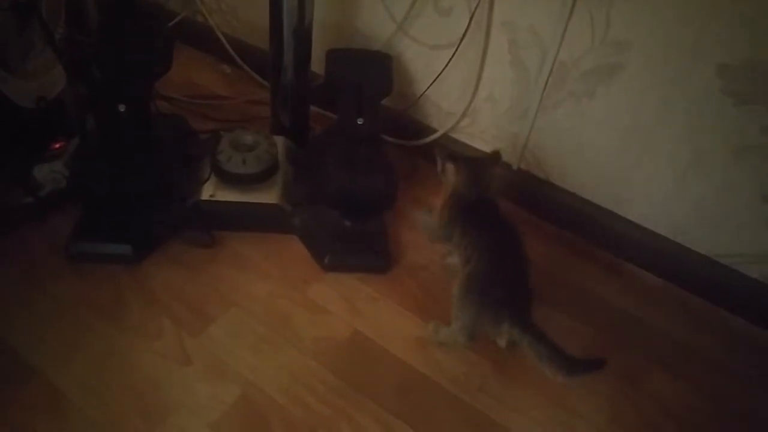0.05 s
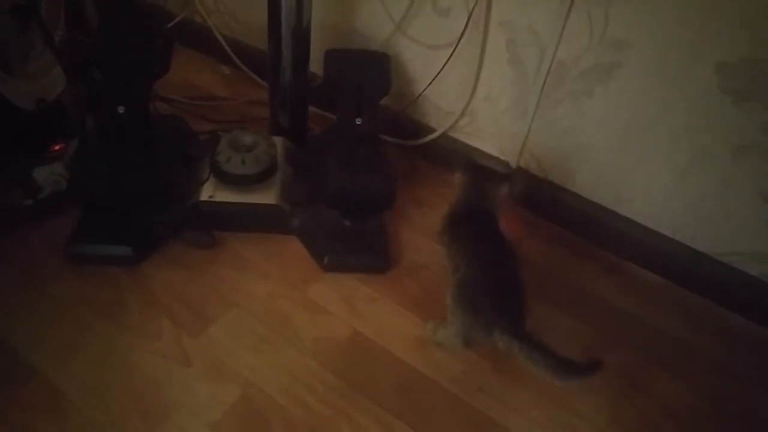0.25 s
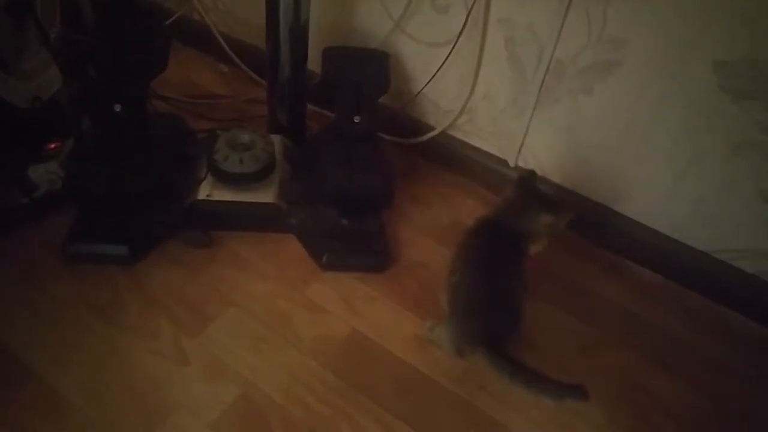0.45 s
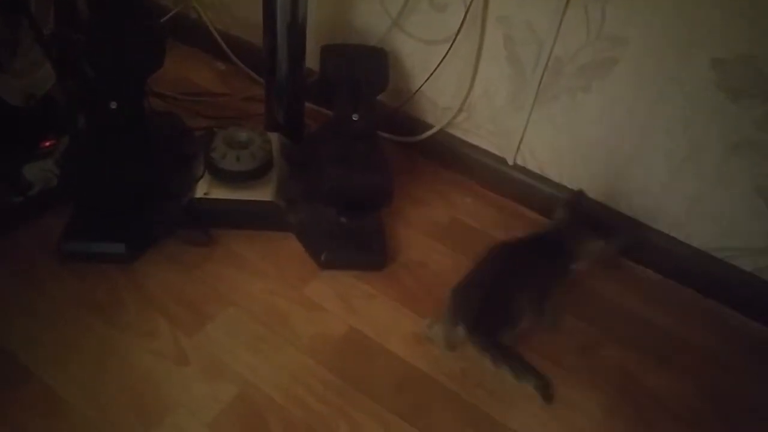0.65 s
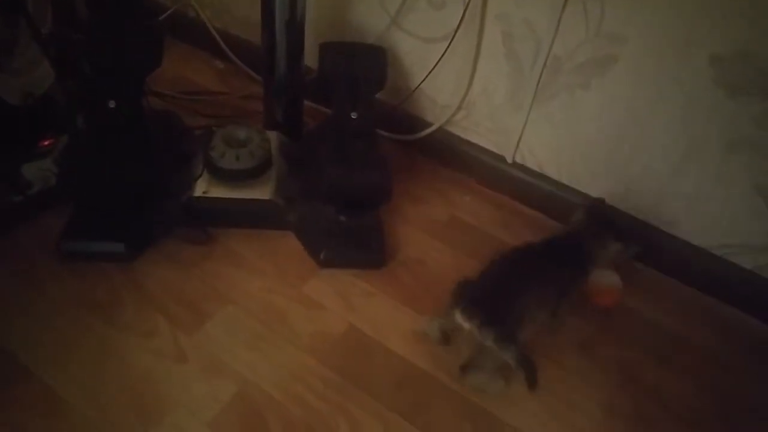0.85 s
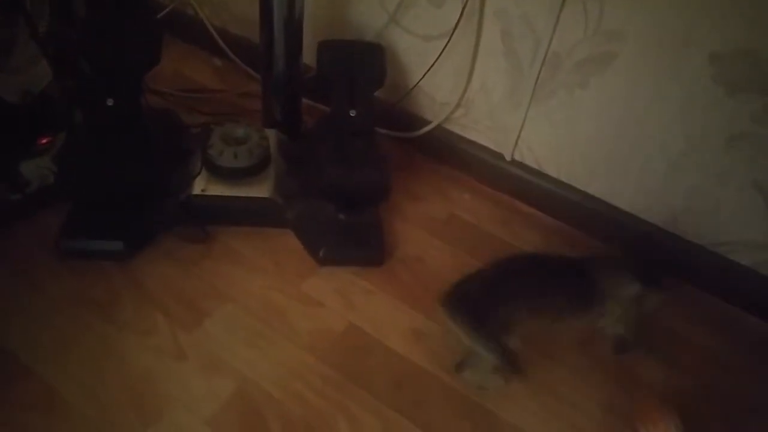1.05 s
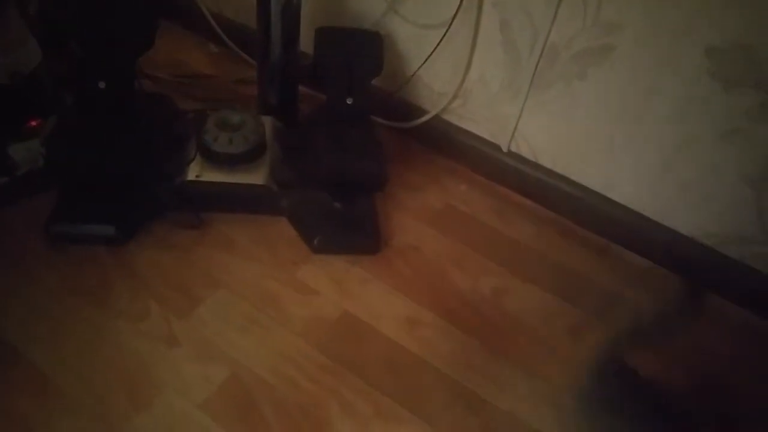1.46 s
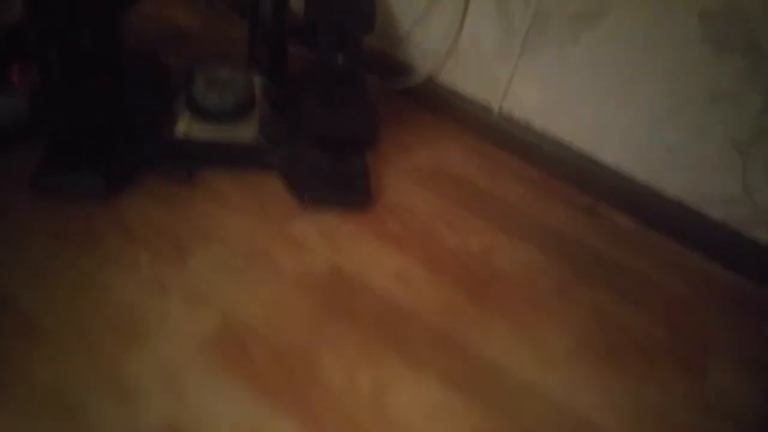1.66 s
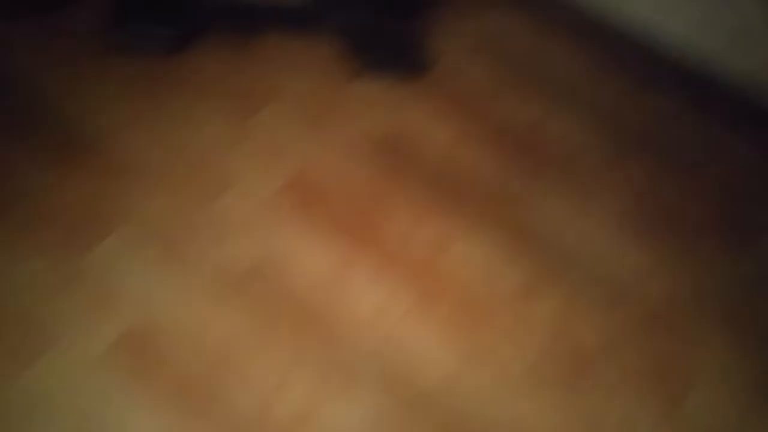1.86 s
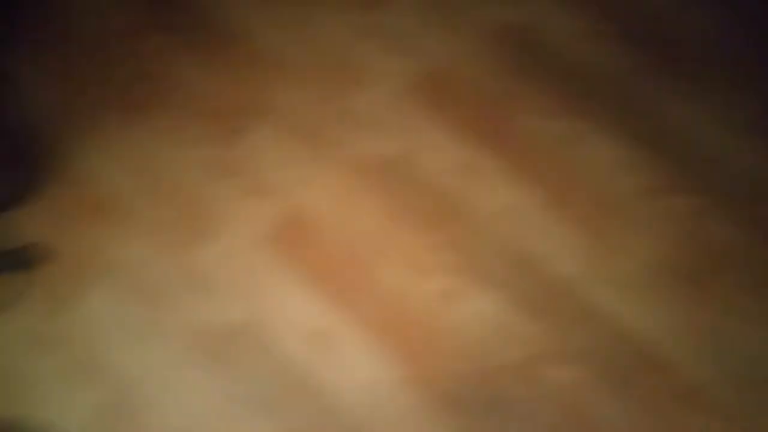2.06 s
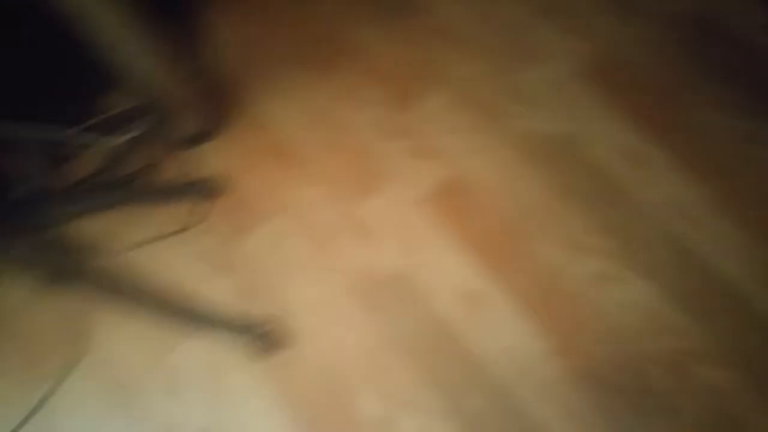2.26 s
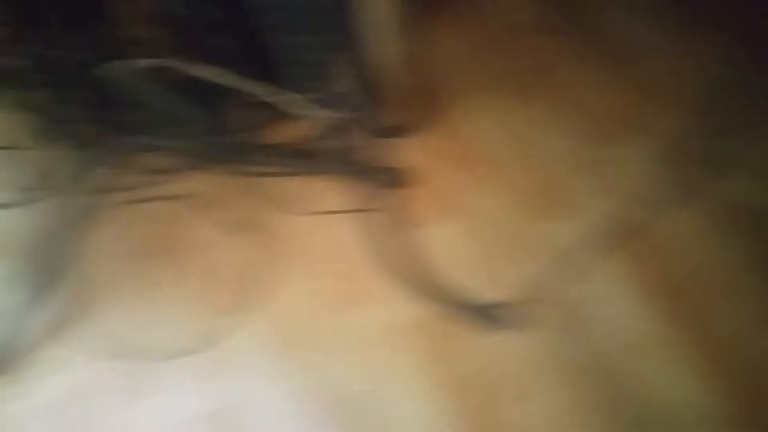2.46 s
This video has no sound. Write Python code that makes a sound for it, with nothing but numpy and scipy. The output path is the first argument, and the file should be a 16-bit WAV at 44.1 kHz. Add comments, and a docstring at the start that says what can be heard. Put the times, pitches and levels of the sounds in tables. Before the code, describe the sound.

A small bell jingles and chatters unevenly inside a hollow ball that a kitten chases over hard floorboards. The shell clacks along and bumps furniture near the end, over a faint appliance hum in a small room, in stereo.

```python
"""A faint appliance hum in a small room, then a jingle: a kitten bats a plastic ball with a bell inside
across a laminate floor, heard on a stereo pair. The pellet strikes the bell and chatters between
strikes; the hollow shell scuffs and taps along the boards as it rolls. Paws thud softly, the floor
rumbles under the play, and near the end the ball knocks against wooden furniture."""
import sys
import numpy as np
from scipy import signal
from scipy.fft import rfft, irfft
from scipy.io import wavfile

SR = 44100
rng = np.random.default_rng(int(sys.argv[2]) if len(sys.argv) > 2 else 0)


def pcm_store(signal):
    """Save signal as 16-bit PCM."""
    levels = np.round(np.clip(np.atleast_2d(signal), -1, 1) * 32767)
    wavfile.write(sys.argv[1], SR, levels.astype(np.int16).T)


N = 110250
TIME = np.arange(N) / SR
AGE = np.arange(SR // 4) / SR  # seconds since a contact
ATTACK_S, THUD_ATTACK_S = 0.0013, 0.0057
CLACK_LIKENESS, TICK_LIKENESS = 0.0074, -0.0064  # left-right correlation: both sound wide

# the bell's partials: (frequency [Hz], relative level [dB], t60 [s])
BELL = [(3400, -5, 0.062), (4024, 1, 0.086), (5257, -1.5, 0.055), (5300, 1.5, 0.063), (5523, -6, 0.028),
        (6478, -5, 0.022), (6760, -25.5, 0.055), (7120, -18.5, 0.034), (7120, 1, 0.022), (7290, 1, 0.089),
        (7320, -8.5, 0.039), (7260, -6.5, 0.04)]


def from_db(db):
    """Decibels to gain."""
    return 10 ** (np.asarray(db) / 20)


def rms_one(x):
    """Scale to unit power."""
    return x / np.sqrt(np.mean(x ** 2) + 1e-20)


def head_one(x):
    """Scale a hit to unit power over its first 11 ms."""
    return x / np.sqrt(np.mean(x[:, :SR // 90] ** 2) + 1e-20)


def curve(rows, column=1):
    """Gain over time from one dB column of a table."""
    rows = np.array(rows)
    return from_db(np.interp(TIME, rows[:, 0], rows[:, column]))


def add(out, s, sound):
    """Mix a sound in at s seconds."""
    i = max(int(s * SR), 0)
    out[:, i:i + sound.shape[1]] += sound[:, :N - i]


def noise(spectrum, likeness, size=N):
    """Stereo noise of a given colour and correlation between the microphones."""
    hz, db = np.transpose(spectrum)
    f = np.maximum(np.fft.rfftfreq(size, 1 / SR), 1)
    gain = from_db(np.interp(np.log(f), np.log(hz), db))
    skirts = np.minimum(f / hz[0], 1) * np.minimum(hz[-1] / f, 1)
    mid, side = irfft(rfft(rng.standard_normal((2, size))) * gain * skirts, size)
    return rms_one(np.sqrt(1 + likeness) * mid + np.sqrt(1 - likeness) * side * np.array([[1], [-1]]))


def grain(depth_db, per_s, size=N):
    """A randomly flickering gain of unit power."""
    knots = rng.standard_normal(4000)
    flicker = np.interp(np.arange(size) / SR * per_s, np.arange(len(knots)), knots)
    return rms_one(from_db(depth_db * flicker))


def ring(modes, attack_s=ATTACK_S, scattered=False):
    """One blow on a set of modes; they reach the two microphones a lag apart, or scattered in phase."""
    detune_hz, spread_db, lag_s = 12.8, 4.5, 0.00016
    out = np.zeros((2, len(AGE)))
    for hz, db, t60 in modes:
        detune, strength, turn, start = rng.standard_normal(4)
        left_lead = 1.53 + 0.38 * turn if scattered else -2 * np.pi * hz * lag_s
        pitch = hz + detune_hz * detune * min(hz / 2000, 2)
        phase = 2 * np.pi * (pitch * AGE + start) + np.array([[left_lead], [0]])
        out += from_db(db + spread_db * strength - 60 * AGE / t60) * np.sin(phase)
    return head_one(out * np.minimum(AGE / attack_s, 1))


def burst(spectrum, t60, likeness, hold_s=0):
    """The grainy, fast dying noise of a contact, coloured differently every time."""
    hz, db = np.transpose(spectrum)
    spots_hz = np.linspace(hz[0], hz[-1], 28)
    patchy_db = np.interp(spots_hz, hz, db) + 5.5 * rng.standard_normal(len(spots_hz))
    hiss = noise(np.column_stack([spots_hz, patchy_db]), likeness, size=len(AGE))
    envelope = from_db(-60 * np.maximum(AGE - hold_s, 0) / t60) * np.minimum(AGE / ATTACK_S, 1)
    return head_one(hiss * envelope * grain(depth_db=-2, per_s=820, size=len(AGE)))


def room_tone():
    """An appliance's wavering hum, still air, and the floor rumbling under the play."""
    # the hum and the rumble, both faint at first: (time [s], relative level [dB])
    hum_levels = [(0, -74), (.15, -72), (.25, -66.5), (2.5, -68.5)]
    rumble_levels = [(0, -9.5), (.15, -16), (.25, -3.5), (.55, -6), (.8, -4.5), (1, 1), (1.9, 2),
                     (2.5, 2.5)]
    # colours of the air and the floor: (frequency [Hz], relative level [dB])
    air_colour = [(20, -8), (60, 15), (110, 42), (170, 2), (250, 11), (390, -3.5), (520, -22), (900, -47.5),
                  (2000, -33), (7000, 21), (16000, -15)]
    rumble_colour = [(25, -39), (60, 0.5), (90, -10), (160, -7.5), (240, -1), (380, 4), (500, -9),
                     (700, -10), (2000, -36)]
    hum_hz = 119.7
    tone = np.sqrt(2) * np.sin(2 * np.pi * hum_hz * TIME)
    hum = curve(hum_levels) * tone * grain(depth_db=3, per_s=22)
    air = from_db(-80) * noise(air_colour, likeness=0.69)
    rumble = from_db(-59.5) * curve(rumble_levels) * noise(rumble_colour, likeness=0.92)
    return hum + air + rumble


def bell_chatter():
    """The pellet tumbles inside the bell: small random touches ring it and tick."""
    # the chatter's swells: (time [s], level [dB])
    swells = [(.17, -79.5), (.195, -38), (.28, -49), (.36, -48), (.47, -44.5), (.57, -66.5), (.62, -56),
              (.8, -66), (.88, -45.5), (.94, -51), (1.05, -32), (1.095, -45), (1.15, -40), (1.21, -36),
              (1.25, -48.5), (1.4, -41.5), (1.63, -49.5), (1.8, -45.5), (1.9, -47), (2.0, -28.5),
              (2.06, -39.5), (2.14, -30), (2.21, -38), (2.26, -44.5), (2.34, -47.5), (2.43, -47),
              (2.5, -36)]
    # how light touches reach the partials, and their hiss: (frequency [Hz], relative level [dB])
    reach = [(3000, -2), (4000, -10), (5300, 1), (6700, 4), (7260, 5.5)]
    hiss_colour = [(1500, -35), (3000, -1), (4500, -5), (5500, -2), (7000, 8), (7800, -5), (9500, -3),
                   (11000, -9.5), (12000, -8.5), (12900, -9.5), (14200, -12), (16000, -12)]
    touches_per_s, tick_decay_s = 260, 0.0079
    touches = (rng.random(N) < touches_per_s / SR) * from_db(2.8 * rng.standard_normal(N))
    ringing = np.zeros((2, N))
    for hz, db, t60 in BELL:
        weight = from_db(db + np.interp(hz, *np.transpose(reach)))
        partial = weight * from_db(-60 * AGE / t60) * np.sin(2 * np.pi * hz * AGE)
        kicks = touches * rng.standard_normal((2, N))
        ringing += signal.fftconvolve(kicks, partial[None], axes=1)[:, :N]
    tick_power = np.abs(signal.fftconvolve(touches ** 2, np.exp(-AGE / tick_decay_s))[:N])
    ticks = rms_one(np.sqrt(tick_power) * noise(hiss_colour, TICK_LIKENESS))
    return curve(swells) * (from_db(-5) * rms_one(ringing) + from_db(-2.5) * ticks)


def hollow(x):
    """The hollow shell lifts a sound at its resonances."""
    # the shell's resonances: (frequency [Hz], lift [dB], width [Hz])
    resonances = [(370, 3, 9.2), (637, 8, 41), (801, 8, 19), (1005, 3.5, 120), (1308, 10, 70),
                  (1580, 0.5, 22)]
    f = np.fft.rfftfreq(N, 1 / SR)
    lift_db = sum(db / (1 + (2 * (f - hz) / width) ** 2) for hz, db, width in resonances)
    return rms_one(irfft(rfft(x) * from_db(lift_db), N))


def scuffing():
    """Shell and claws rub on the boards: two bands of grainy noise."""
    # strength of the rubbing: (time [s], low band [dB], high band [dB])
    levels = [(.17, -74, -86), (.195, -42.5, -45), (.23, -38, -35), (.26, -40, -57), (.31, -37.5, -42.5),
              (.37, -50.5, -54.5), (.48, -52, -58), (.598, -70, -71), (.615, -31.5, -42.5),
              (.65, -43.5, -52.5), (.83, -47, -51.5), (.89, -42, -49.5), (1.0, -50.5, -48.5),
              (1.02, -37.5, -32), (1.05, -43, -39), (1.1, -50.5, -46.5), (1.17, -39.5, -37),
              (1.29, -72, -56), (1.39, -48, -49), (1.5, -56, -41.5), (1.68, -65, -56), (2.05, -56.5, -47.5),
              (2.09, -64, -46), (2.16, -51, -42.5), (2.25, -62, -51.5), (2.34, -62.5, -55.5),
              (2.5, -49, -53)]
    # colours of the bands: (frequency [Hz], relative level [dB])
    low_colour = [(120, -23.5), (250, -9), (400, -9.5), (540, -6), (720, 4.5), (1030, 1), (1300, -4.5),
                  (2000, -24)]
    high_colour = [(700, -82), (1100, -19), (1400, 2), (2200, 5.5), (3000, -3.5), (4500, -1), (8000, -29)]
    low = curve(levels, column=1) * hollow(noise(low_colour, likeness=0.28))
    high = curve(levels, column=2) * hollow(noise(high_colour, CLACK_LIKENESS))
    return (low + high) * grain(depth_db=4.5, per_s=150)


def rebound(hit):
    """The pellet touches three more times within milliseconds, roughening and colouring the ring."""
    mean_gap_s = 0.0018
    out, delay = hit.copy(), 0
    for k, (gap, size) in enumerate(rng.random((3, 2))):
        delay += 1 + int(mean_gap_s * (.5 + gap) * SR)
        out[:, delay:] += from_db(-4.5 + k) * (.5 + size) * hit[:, :-delay]
    return head_one(out)


def jingle(modes, force_db):
    """The pellet buzzes on the ringing bell; struck hard, the bell meets the cage and is choked."""
    buzz_s, choke_after_s, choke_s = .012, 0.0077, 0.0047
    flutter = noise([(35, 0), (350, 0)], likeness=0.31, size=len(AGE))
    buzz = 1 + .55 * np.exp(-AGE / buzz_s) * flutter
    depth_db = .5 * max(force_db + 20, 0) - 1
    contact = 1 - np.exp(-np.maximum(AGE - choke_after_s, 0) / choke_s)
    ringing = rebound(ring(modes, attack_s=0.0027, scattered=True))
    return head_one(ringing * buzz * from_db(-depth_db * contact))


def bell_strikes():
    """Each strike of the pellet rings the bell's groups of partials, ticks and jolts the plastic cage."""
    # pellet strikes: (time [s], five groups of partials near 4, 5.3, 6.5, 6.75 and 7.3 kHz [dB],
    # cage clack [dB], tick [dB], top partials and fizz [dB], left minus right [dB])
    strikes = [(0.1833, -62, -48, -48, -44, -44.0, -59, -56, -68, 5),
               (0.2178, -46, -37, -53, -54, -29, -43.5, -38, -47, 2.5),
               (0.2575, -40, -30, -30.5, -34.5, -33, -46, -38.5, -45, -1.5),
               (0.269, -47, -59, -53, -49.5, -31, -48, -39, -49.0, 10),
               (0.2921, -35, -25.5, -36, -44, -32.5, -46, -37, -32, 0.5),
               (0.4004, -49, -37.5, -31.5, -54, -43, -37.5, -43.5, -44.5, -1),
               (0.4469, -60, -57.5, -54.5, -55, -31.5, -46.5, -49, -62, 3),
               (0.4813, -36, -34, -40.5, -47.5, -26, -38.5, -34.5, -46, 2.5),
               (0.5906, -69.5, -44, -37.5, -35, -40, -64, -49, -51, 1),
               (0.608, -46, -48.0, -46.5, -50, -34.5, -63, -35, -51, 4.5),
               (0.6506, -36.5, -25.5, -35, -28, -38, -33.5, -33, -45.5, -3),
               (0.661, -47, -36, -34, -31.0, -33, -35, -36.5, -39, 4),
               (0.691, -38.5, -59.5, -42, -50, -29, -54, -34, -45, -3),
               (0.7019, -48, -35, -29.5, -24, -45, -48, -34, -34, 3),
               (0.7552, -52, -40, -49.5, -49, -28.5, -31.5, -29, -37, -1.5),
               (0.7721, -67, -32.5, -33, -22.5, -28, -55, -38, -52, 6),
               (0.7963, -77.0, -29.5, -41.5, -40, -28.5, -55, -54, -58.5, -2),
               (0.8065, -75, -46, -48.5, -30.5, -28.5, -63, -49.0, -62, -1),
               (0.829, -76.0, -42, -58.0, -54, -35.5, -64, -43.5, -69.5, 4),
               (0.899, -46, -29.0, -48.5, -27, -30.5, -53, -47, -53.5, 2),
               (0.9252, -46, -29, -29.5, -32, -28.5, -53, -39.5, -41, -4),
               (0.939, -40, -40, -49.5, -47, -23, -47, -45, -46, 9),
               (0.948, -54.5, -48, -53.0, -25.5, -22.5, -50.5, -46, -59.5, 5),
               (0.984, -61, -19.5, -36, -12.5, -23, -56, -36, -40, -1.5),
               (1.0254, -65, -31.5, -37.0, -42, -24.5, -36.5, -28.5, -42, 2),
               (1.08, -43, -56.0, -42, -53, -36.0, -37, -38.0, -46.5, 1.0),
               (1.105, -40, -26.5, -37, -29, -19, -40, -26.5, -37, 0.0),
               (1.1313, -35, -43.0, -31, -36, -17.5, -34, -27, -44, -0.5),
               (1.1588, -56, -52, -43, -47, -33, -36, -49, -62.5, 1),
               (1.187, -57.5, -37, -52.0, -40, -37, -41, -34.5, -49.0, 1),
               (1.205, -65.5, -53.5, -44, -49.0, -30.5, -40.5, -40, -57.5, 2),
               (1.2587, -48, -42, -42, -31.5, -55, -44, -51, -56, -1.5),
               (1.2791, -33, -27, -25, -38.5, -16.5, -40, -27.5, -30.5, 3),
               (1.3498, -37.5, -34.5, -53.5, -56.5, -49, -44, -33, -31, 1.5),
               (1.3824, -41, -33, -39, -40, -34, -37, -36, -43.5, 2),
               (1.4163, -57, -38.5, -20.5, -29.0, -36, -59, -37.0, -37.5, -1),
               (1.4615, -55, -43.5, -46, -37, -31.5, -45, -27.5, -31, 0.5),
               (1.5155, -39.5, -32, -29.5, -34.5, -39, -43.0, -39.5, -59.0, 1.5),
               (1.5504, -51, -39, -35, -31.5, -31, -38, -34, -46, -1),
               (1.642, -52, -56.0, -41, -38, -36.5, -41.5, -45, -47, 1),
               (1.658, -47, -38, -39, -41.5, -33.5, -42.5, -41.5, -52.0, 0),
               (1.6816, -46, -28, -32, -24.5, -28.5, -42.5, -40.5, -65.5, -0.5),
               (1.754, -43, -36.5, -62.0, -47, -49, -64, -39.5, -42.5, -0.5),
               (1.8181, -32.5, -37, -56, -49, -27.5, -57, -34.5, -41.5, 2.5),
               (1.88, -40.5, -46, -53, -43, -36, -50, -40, -49.5, 1.0),
               (1.9119, -64.5, -33.5, -55, -35, -20, -58, -36, -55, -1),
               (1.9512, -39, -35, -56.0, -50.5, -35.0, -50, -38.5, -47.0, 3),
               (1.991, -42.5, -50.5, -52, -61.5, -32, -39.0, -42, -51.5, -4),
               (2.0671, -51, -52, -50.5, -35, -44, -28.5, -33.5, -53, -3),
               (2.0739, -61, -56.5, -42, -37, -19.5, -28.5, -30, -49, 0.5),
               (2.0944, -42.5, -36, -39.0, -48.0, -28.5, -30, -33.5, -41, 1),
               (2.1223, -61.5, -22, -41, -20.5, -31, -38, -40.0, -45, 2.5),
               (2.149, -50, -31.5, -41, -45.0, -33.5, -30, -46, -51.0, -2.5),
               (2.211, -53, -51, -41.5, -50, -44, -38.5, -48, -58, -3),
               (2.3637, -56, -64, -55.5, -62.0, -50, -42.5, -61, -69, -4),
               (2.473, -68.5, -67, -47, -41, -44, -55, -48, -58, -1.5)]
    # the five groups: borders [Hz] and level trims [dB]
    edges = [3000, 4600, 5900, 6600, 6950, 7900]
    trims = [-0.5, -1.5, -2, -2, -1]
    # the bell's highest partials: (frequency [Hz], relative level [dB], t60 [s])
    top_partials = [(12660, -0.21, 0.031), (12700, -1.8, 0.052)]
    # fizz on top, tick of the contact, clack of the cage: (frequency [Hz], relative level [dB])
    fizz = [(11900, -11), (12800, 8), (13600, -4), (14400, 6), (15400, -18), (16000, -3)]
    tick = [(2500, -23), (3300, -4), (4500, -10.5), (5500, 2), (7000, -7.5), (7800, 0), (9500, 4),
            (11000, -3), (12000, -21), (16000, -32)]
    cage = [(700, -18), (1400, -2.5), (2200, 6), (3000, -1), (4200, 2.5), (6000, -6.5)]
    groups = [[mode for mode in BELL if lo < mode[0] <= hi] for lo, hi in zip(edges, edges[1:])]
    out = np.zeros((2, N))
    for s, *levels, cage_db, tick_db, top_db, pan_db in strikes:
        force_db = max(levels)
        hit = sum(from_db(db + trim) * jingle(modes, force_db)
                  for db, trim, modes in zip(levels, trims, groups))
        hit += from_db(top_db - 2.5) * jingle(top_partials, force_db)
        hit += from_db(top_db - 4) * burst(fizz, t60=0.053, likeness=TICK_LIKENESS)
        hit += from_db(tick_db - 1) * burst(tick, t60=0.077, likeness=TICK_LIKENESS, hold_s=0.0061)
        hit += from_db(cage_db - 2.5) * burst(cage, t60=0.085, likeness=CLACK_LIKENESS)
        pan = rms_one(from_db(pan_db * np.array([[.5], [-.5]])))
        add(out, s, hit * pan)
    return out


def shell_taps():
    """The rolling shell taps the floor: a low body note, a higher clack and a short crack."""
    # taps on the boards: (time [s], body [dB], clack and crack [dB])
    taps = [(0.1903, -53, -66), (0.607, -39.5, -34), (0.7343, -38.5, -47), (0.861, -37.5, -43),
            (0.9236, -41.5, -41.5), (0.9633, -41.5, -40), (1.0148, -41, -28), (1.0605, -38.5, -47),
            (1.1575, -34, -31), (1.184, -33.5, -32), (1.2124, -28, -26.5), (1.2583, -31.5, -26.5),
            (1.317, -32.5, -26.5), (1.3574, -33, -32), (1.3887, -38, -33.5), (1.4135, -36.5, -34),
            (1.4471, -36.5, -32.5), (1.4831, -37.5, -37), (1.5411, -39, -36), (1.5661, -52.5, -41),
            (1.6, -40, -39.5), (1.616, -51, -37), (1.6463, -59, -43), (1.7039, -49, -41), (1.72, -58, -35),
            (1.747, -47, -33), (1.7835, -46.5, -32.5), (1.815, -49, -33.5), (1.8558, -58, -31.5),
            (1.9604, -65, -35), (2.1452, -60, -40.5)]
    # the shell's low and high modes: (frequency [Hz], relative level [dB], t60 [s])
    body_modes = [(386, -5, 0.075), (460, -11, 0.062), (625, -4, 0.059), (831, -1.5, 0.1), (960, 1, 0.038),
                  (1108, -2, 0.059)]
    clack_modes = [(1160, -8, 0.14), (1370, 4.5, 0.038), (1513, 7.5, 0.058), (1669, 7.5, 0.043),
                   (1865, 9.5, 0.022), (2130, -23, .025), (2630, -2, 0.028)]
    # colour of the crack: (frequency [Hz], relative level [dB])
    crack_colour = [(350, -28), (700, -20), (1400, 17.5), (2100, 1.5), (2800, -1), (4000, -5), (8000, -43)]
    out = np.zeros((2, N))
    for s, body_db, clack_db in taps:
        body = from_db(body_db - 5) * ring(body_modes)
        clack = from_db(clack_db - 5.5) * ring(clack_modes)
        crack = from_db(clack_db - 11) * burst(crack_colour, t60=0.028, likeness=CLACK_LIKENESS)
        add(out, s, body + clack + crack)
    return out


def cage_bounces():
    """Hard bounces set the plastic cage ringing."""
    # the bounces: (time [s], level [dB])
    bounces = [(.7557, -49), (1.1318, -34), (1.2796, -29.5)]
    # the cage's mode: (frequency [Hz], relative level [dB], t60 [s])
    cage_mode = [(2203, 0, 0.14)]
    out = np.zeros((2, N))
    for s, db in bounces:
        add(out, s, from_db(db) * ring(cage_mode))
    return out


def paw_thuds():
    """Paws land softly on the boards: a low note and its shorter octave."""
    # landings: (time [s], level [dB], pitch [Hz], t60 [s])
    paws = [(0.884, -53.5, 128, 0.13), (0.925, -50.5, 145, 0.041), (0.924, -54, 86, 0.099),
            (1.914, -59, 61, 0.21)]
    out = np.zeros((2, N))
    for s, db, hz, t60 in paws:
        add(out, s, from_db(db) * ring([(hz, 0, t60), (2 * hz, -6, t60 / 2)], THUD_ATTACK_S))
    return out


def furniture_knock():
    """The ball meets furniture once and rings the wood."""
    # the wood's modes: (frequency [Hz], relative level [dB], t60 [s])
    wood = [(212.4, -16, 0.23), (247, -15, 0.15), (383.7, -4, 0.12), (477, -6, 0.1), (587, -15, 0.081)]
    out = np.zeros((2, N))
    add(out, s=2.067, sound=from_db(-30.5) * ring(wood, THUD_ATTACK_S))
    return out


def room_reflections(x):
    """Nearby walls return a short diffuse tail, different at each microphone."""
    # colour of the tail: (frequency [Hz], relative level [dB])
    colour = [(100, -10), (500, 4.5), (3000, -6), (8000, 7.5), (16000, -14.5)]
    level_db, t60, delay_s = -12, 0.17, 0.0015
    tail = noise(colour, likeness=0, size=len(AGE)) * from_db(-60 * AGE / t60) * (AGE > delay_s)
    tail /= np.sqrt(np.sum(tail ** 2) / 2)
    return from_db(level_db) * signal.fftconvolve(x, tail, axes=1)[:, :N]


def scene():
    """Ball, bell and paws reach the microphones directly and off the walls, over the room tone."""
    play = bell_strikes() + cage_bounces() + bell_chatter()
    play += shell_taps() + scuffing() + paw_thuds() + furniture_knock()
    return play + room_reflections(play) + room_tone()


def record(dry):
    """The treble is cut steeply above 15.8 kHz."""
    return signal.sosfilt(signal.ellip(10, .2, 80, 15800, fs=SR, output="sos"), dry)


dry = scene()
out = record(dry)
pcm_store(out)
```